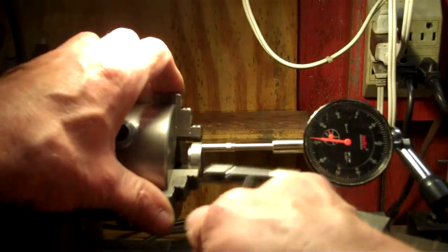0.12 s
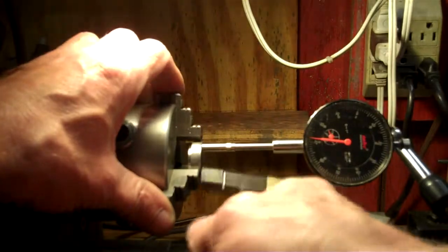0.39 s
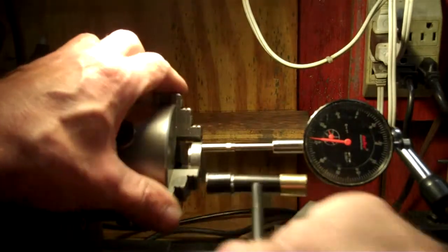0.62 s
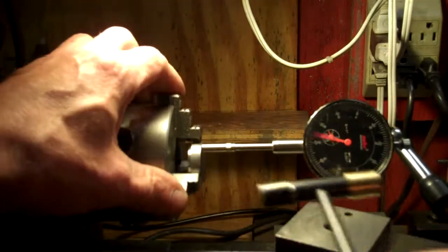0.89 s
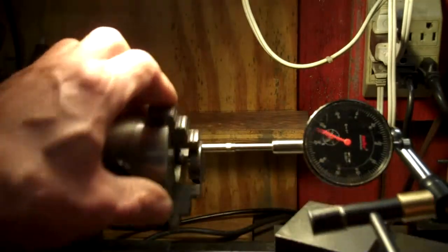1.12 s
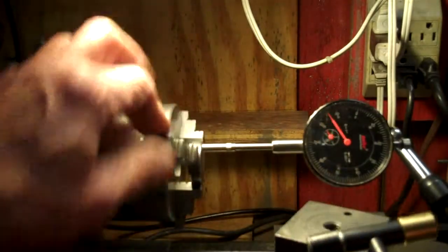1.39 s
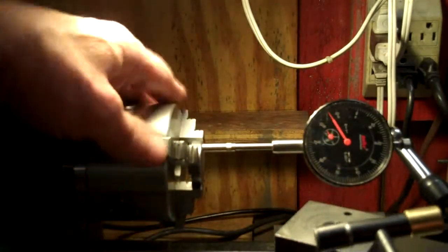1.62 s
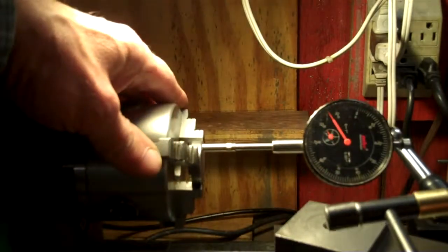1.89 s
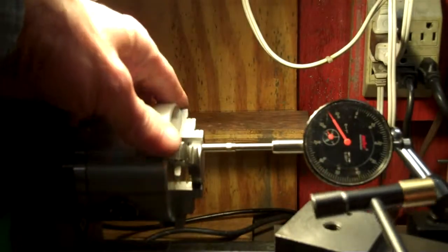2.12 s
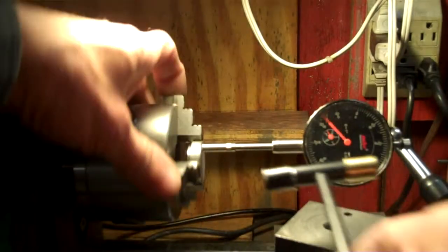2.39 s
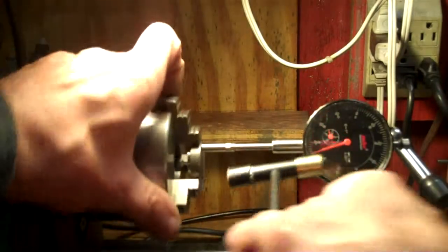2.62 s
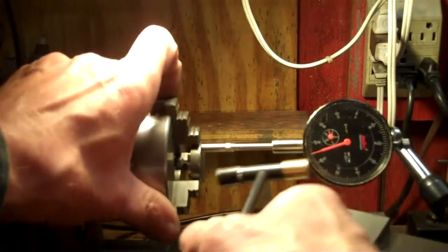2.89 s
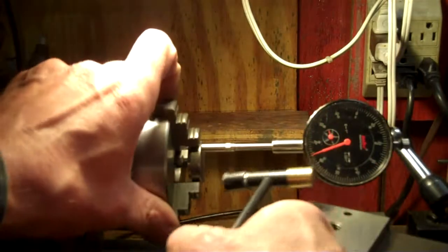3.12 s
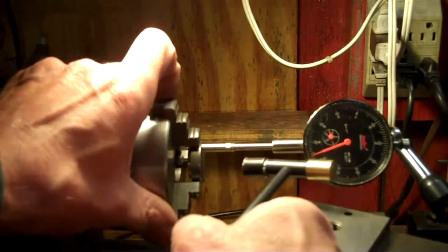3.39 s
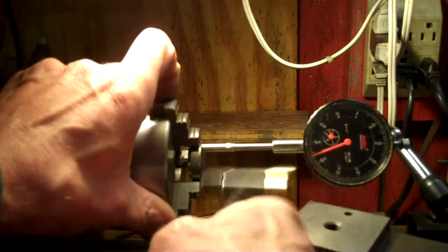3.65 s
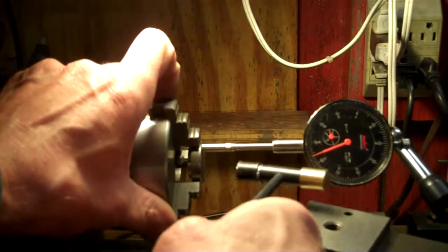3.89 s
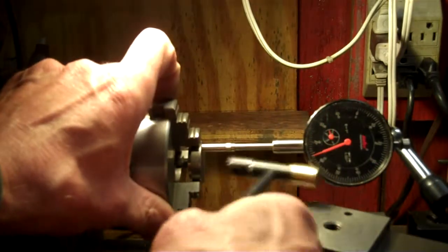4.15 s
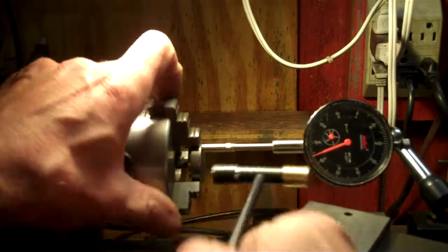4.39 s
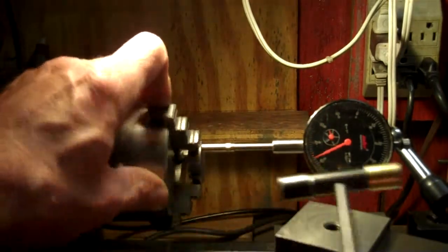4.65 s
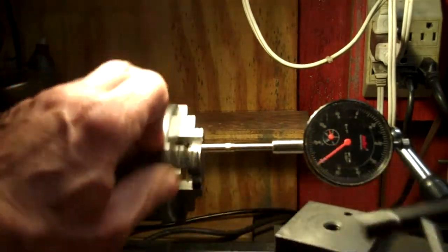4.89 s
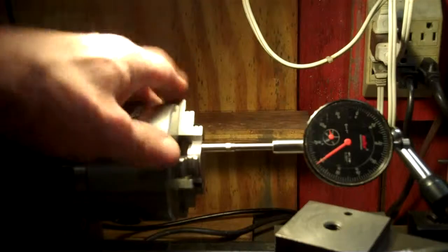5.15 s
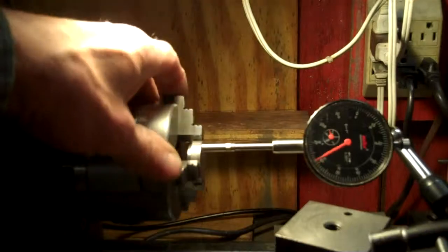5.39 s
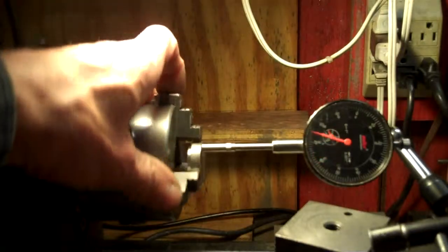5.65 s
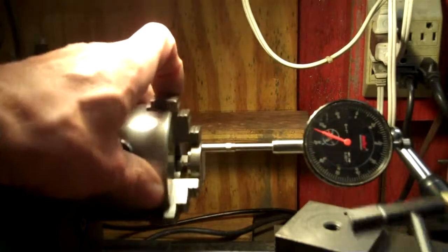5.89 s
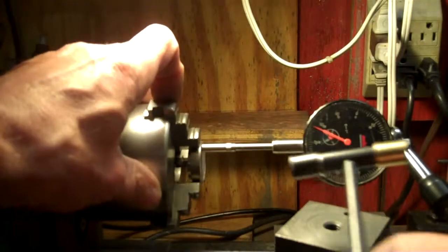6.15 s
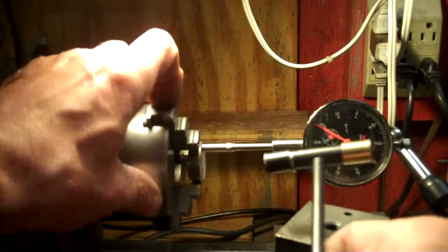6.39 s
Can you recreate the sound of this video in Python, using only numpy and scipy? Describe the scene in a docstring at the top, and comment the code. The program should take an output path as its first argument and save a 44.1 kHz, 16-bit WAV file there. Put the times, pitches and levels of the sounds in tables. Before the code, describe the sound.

Three piercing, clipped steel clanks with tiny bounces open the scene, close to a stereo microphone. Loose gear teeth rattle as the chuck is turned by hand; tools click softly, then one loud snap and a gritty scrape. Three more clanks follow, spaced unevenly, then rattling, rustling and a weak squeaking belt in a short-echo workshop with low hum and steady hiss.

```python
"""In a quiet workshop, a small brass hammer taps a steel part true in the chuck of a bench lathe.
Six hard blows, each with a bounce, are decaying sines of steel and bed plus a clatter of dying noise.
Between them a hand turns the chuck: gears rattle and skin and cloth rustle, both from shaped noise.
The belt squeaks in overtones of its slips; a tool clicks and scrapes in short or torn noise.
The workshop hums and hisses behind; the close stereo microphone clips on the blows."""
import sys
import numpy as np
from scipy import signal
from scipy.fft import rfft, irfft, next_fast_len
from scipy.io import wavfile
from scipy.ndimage import uniform_filter1d, map_coordinates

SR = 44100
rng = np.random.default_rng(int(sys.argv[2]) if len(sys.argv) > 2 else 0)


def volts_from_decibels(level):
    """Turn decibel levels (scalar or array-like) into linear amplitude factors."""
    exponent = np.asarray(level, float) / 20
    return 10 ** exponent


def dump_mix(stems):
    """Bounce the given channels to the path in sys.argv[1] as a 16-bit WAV at rate SR."""
    frames = np.atleast_2d(stems).T  # one column per channel
    limited = np.clip(frames, -1, 1)  # hard clip at full scale
    pcm = np.round(limited * 32767).astype(np.int16)
    wavfile.write(sys.argv[1], SR, pcm)


N = 287532  # length [samples]

# air and microphone hiss: (frequency [Hz], level per Hz [dB])
AIR_COLOUR = [(15, -46), (25, -18), (85, -18.5), (116, -6.5), (160, -19), (198, -7), (373, -21),
              (500, -15.5), (669, -17), (724, -16), (1300, -19.5), (1780, -22.5), (3750, -21),
              (4060, -21.5), (14100, -27)]
# how alike the hiss is at left and right: (frequency [Hz], likeness [-1 to 1])
AIR_LIKENESS = [(60, -0.34), (240, 0.5), (950, 0.51), (3750, -0.09), (14900, -0.03)]
# hum bands: (centre [Hz], level [dB], half-width [Hz])
HUM_BANDS = [(124, -76, 2.7), (186, -69, 4.1), (285, -74.5, 33), (462, -77.5, 5.5)]
# hammer blows: (time [s], level [dB], treble less 9 [dB], bounce delay [s], bounce loss [dB])
BLOWS = [(0.1854, 0.5, -8.5, .0165, 14), (.3384, 5, -11, .0116, 7.5), (0.4984, 5.5, -6.5, .0108, 11.5),
         (3.7792, 5, -5, .0129, 10), (4.1680, 5, -5.5, .0132, 10.5), (4.3243, 5, -5, .0116, 8)]
# ringing of part, chuck and hammer head: (pitch [Hz], level [dB], own time to fall 60 dB [s])
STEEL_MODES = [(2057, -27.5, 0.09), (2697, -15, .06), (2753, -4, 0.063), (2785, -12, .12),
               (3234, -19.5, 0.057), (4180, -22, 0.061), (5094, -12, 0.061), (5470, -12.5, .06),
               (5969, -9.5, 0.077), (6090, -12.5, .05), (6384, -12.5, 0.058), (6994, -15, .07),
               (7537, -16.5, .07), (7956, -7.5, 0.049), (8270, -17, 0.016)]
# ringing of lathe bed and bench: (pitch [Hz], level [dB], time to fall 60 dB [s])
BED_MODES = [(183, -38, 0.39), (262.5, -16.5, 0.33), (299.5, -18.5, 0.46), (375, -6.5, 0.16),
             (388, -7.5, 0.28), (453.5, 0.5, 0.11), (625, -21.5, .15), (763, -22.5, .12), (925, -27, 0.23),
             (1210, -22.5, .07)]
# colour of loose metal clattering after a contact: (frequency [Hz], level per Hz [dB])
CLATTER_COLOUR = [(300, -48.5), (600, -20), (1000, -17), (1500, -26.5), (2200, -16.5), (2750, -9.5),
                  (3300, -7.5), (4600, -8.5), (5200, -4.5), (6500, -7), (8100, -6), (8500, -14),
                  (10500, -20), (13500, -20.5), (14000, -29), (15500, -43.5)]
# how the clatter dies by itself: (frequency [Hz], time to fall 60 dB [s])
CLATTER_DECAY = [(500, 0.088), (1500, 0.21), (2700, .12), (4000, 0.08), (7000, 0.075), (12000, 0.077)]
# lathe sound at the two microphone ports: (frequency [Hz], left over right [dB])
PORT_LEVELS = [(100, 0.5), (300, 0), (700, 2.5), (1500, 1.5), (2700, -2), (4500, -0.5), (6500, -4.5),
               (8000, 10), (10000, 8), (14000, 5.5)]
# phase at the two ports: (frequency [Hz], left ahead of right [rad])
PORT_PHASES = [(300, -1.73), (460, 0.28), (700, 0), (1500, -1.3), (2700, -0.41), (4500, -0.9),
               (5500, -0.66), (7500, 1), (9000, 2), (14000, 1.7)]
# the room's answer: (frequency [Hz], time to fall 60 dB [s])
ROOM_DECAY = [(300, 0.22), (2000, 0.19), (7000, .25), (12000, 0.084)]
# skin and cloth sliding over metal: (start [s], rise [s], hold [s], fall [s], level [dB])
RUBS = [(0.661, .04, 0.21, .1, -65.5), (0.928, 0.14, 0.072, .1, -56), (1.18, 0.056, 0.224, .22, -61.5),
        (1.697, 0.031, 0.114, .04, -63), (2.032, 0.032, .04, .12, -63.5), (2.297, .2, 0.129, .06, -53),
        (2.64, .03, .08, .02, -57.5), (2.86, .03, 0.095, .04, -60.5), (3.036, 0.017, 0.21, .07, -62),
        (3.36, .06, 0.039, .08, -65), (3.563, .05, .14, .03, -62), (4.498, .07, 0.138, .05, -60),
        (4.72, 0.039, .33, .12, -59), (5.386, 0.036, .7, .05, -63.5), (6.214, 0.058, .06, .06, -65),
        (6.428, .06, .04, .03, -59)]
# colour of the rustle, and of a knock's bright edge: (frequency [Hz], level per Hz [dB])
RUSTLE_COLOUR = [(880, -50), (1500, -16), (1630, -22), (1930, -26), (2460, -12), (4040, -12.5),
                 (4350, -9.5), (4600, -11), (4960, -10), (5450, -7), (7080, -5), (7420, -2), (7840, -3),
                 (10000, -21), (14000, -21.5)]
# pulls of the hand on the chuck: (start [s], rise [s], hold [s], fall [s], gear rattle [dB])
PULLS = [(0.84, 0.21, 0.14, 0.55, -56), (2.052, 0.069, .2, 0.11, -65.5), (2.305, 0.24, .2, 0.034, -57.5),
         (3.044, 0.054, .12, .12, -68.5), (3.56, 0.13, 0.089, .03, -68.5), (4.596, .28, 0.11, 0.21, -54),
         (5.37, 0.275, 0.305, 0.22, -63), (6.22, 0.068, 0.046, .08, -65), (6.42, 0.087, .05, .03, -64.5)]
# resonances that colour the gears: (centre [Hz], width [Hz], level [dB])
GEAR_MODES = [(162.2, 77, -4.5), (390, 72, 3), (710, 79, -1), (1210, 130, 1), (1354, 240, -5.5),
              (1880, 380, 1), (2190, 280, -15.5), (3670, 610, -17.5)]
# the louder gear knocks: (time [s], peak of the dull body [dB])
KNOCKS = [(0.965, -44), (0.9939, -46.5), (1.0158, -48), (1.0414, -38), (1.0591, -42), (1.0851, -43.5),
          (1.1289, -35.5), (1.1444, -40), (1.2015, -40.5), (1.2236, -41.5), (1.2506, -40), (1.3087, -45.5),
          (2.72, -38), (3.1079, -50.5), (3.1705, -48), (4.7435, -41.5), (4.8559, -38.5), (4.9531, -42.5),
          (4.9928, -38), (5.4716, -41.5), (5.4994, -45.5), (5.5947, -45), (5.7186, -45.5), (5.8194, -45)]
# small contacts of tools and jaws: (time [s], level [dB], snap centre [Hz], body over snap [dB],
# left over right [dB])
TICKS = [(1.4363, -37.5, 1660, -8, 1.5), (1.736, -40, 7400, -19, 3.5), (2.2462, -54.5, 2120, -15, 3.5),
         (2.583, -37, 5500, -22.5, -8), (2.5899, -34.5, 4400, -2.5, 1), (2.621, -29.5, 7640, -33, 13),
         (2.6708, -29.5, 6400, 0, 0), (2.7546, -2.5, 7400, -7.5, 5), (4.2906, -24, 1907, -6.5, -2),
         (4.3002, -24.5, 2080, -7, 4), (4.6376, -44, 3500, -0.5, 0), (5.253, -37, 6960, -23, 11.5),
         (5.3122, -49.5, 2160, 0, 5)]
# belt squeaks: (start [s], length [s], slip rate [Hz], level [dB])
SQUEAKS = [(1.483, 0.043, 726, -58.5), (1.541, 0.018, 743, -63), (1.585, 0.032, 763, -66.5),
           (2.256, 0.043, 722, -66), (2.301, 0.053, 714, -59.5), (4.665, 0.052, 724, -64),
           (5.756, 0.37, 722.6, -57.5), (6.16, 0.048, 726, -65.5), (6.27, 0.036, 730, -61.5),
           (6.333, 0.017, 721, -68), (6.48, .06, 725, -60)]
# strength of each multiple of the slip rate, lowest first: (level [dB])
SQUEAK_OVERTONES = [-2, -2, 0, -11, -16, -15, -14, -20]
# a tool dragged over steel, creeping, biting, letting go: (time [s], level [dB])
SCRAPE_LEVEL = [(2.75, -72), (2.765, -40), (2.791, -38.5), (2.794, -27.5), (2.812, -21.5), (2.834, -23),
                (2.842, -38.5), (2.86, -51), (2.9, -65)]
# colour of the scrape: (frequency [Hz], level per Hz [dB])
SCRAPE_COLOUR = [(180, -60.5), (300, -36), (403, -27), (597, -37), (869, -14), (1520, -18.5), (1700, -12),
                 (2210, -6.5), (2440, -19), (2820, -14.5), (4850, -22.5), (8050, -8), (10600, -46),
                 (13600, -39), (15000, -82)]


def unit(x):
    """Scales x to an average strength (rms) of 1."""
    return x / np.sqrt(np.mean(x ** 2) + 1e-20)


def along(points, hz):
    """Reads a (Hz, value) curve on a log frequency axis."""
    f, value = np.transpose(points)
    return np.interp(np.log(hz + 1), np.log(f + 1), value)


def wobble(rate):
    """A smooth random curve with rate random points a second."""
    return map_coordinates(rng.standard_normal(int(N * rate / SR) + 4), [np.arange(N) * rate / SR])


def swell(start, rise, hold, fall):
    """A smooth rise to 1, a hold and a fall; times in seconds."""
    t = np.arange(N) / SR - start
    slope = np.minimum(t / rise, (rise + hold + fall - t) / fall)
    return np.sin(np.pi / 2 * np.clip(slope, 0, 1)) ** 2


def filtered(x, response):
    """Multiplies the spectrum of x by a response of frequency."""
    m = next_fast_len(x.shape[-1] + 8192)
    return irfft(rfft(x, m) * response(np.fft.rfftfreq(m, 1 / SR)), m)[..., :x.shape[-1]]


def resonance(hz, centre, width):
    """Response that lets through a band round its centre, all in Hz."""
    return 1j * hz * width / (centre ** 2 - hz ** 2 + 1j * hz * width)


def pair(colour, likeness):
    """Stereo noise of rms 1: the balance of middle and side sets how alike left and right are."""
    def response(hz):
        angle = np.arccos(np.clip(along(likeness, hz), -1, 1)) / 2
        return volts_from_decibels(along(colour, hz)) * np.array([np.cos(angle), np.sin(angle)])
    mid, side = filtered(rng.standard_normal((2, N)), response)
    return unit(np.array([mid + side, mid - side]))


def dying(times, length):
    """Two channels of noise in which each frequency dies at its own speed; energy 1 in the first."""
    hz, t, z = signal.stft(rng.standard_normal((2, length)), SR, nperseg=128)
    fade = volts_from_decibels(-60 * t / along(times, hz)[:, None])
    tail = signal.istft(z * fade, SR, nperseg=128)[1][:, :length]
    return tail / np.linalg.norm(tail[0])


def ring(modes, t, scatter_db, attack, detune):
    """Metal rings as decaying sines, at slightly new strengths and pitches each time."""
    hz, db, t60 = np.transpose(modes)[:, :, None]
    hz = hz * (1 + detune * rng.standard_normal(hz.shape))
    size = volts_from_decibels(db + scatter_db * rng.standard_normal(hz.shape) - 60 * t / t60)
    return (size * np.sin(2 * np.pi * hz * t)).sum(0) * (1 - np.exp(-(t / attack) ** 2))


def workshop():
    """Air and microphone hiss as wide noise, with a few hum bands of narrow noise."""
    def band(centre, width):
        noise = rng.standard_normal(N)
        return unit(filtered(noise, lambda hz: 1 / (1 + ((hz - centre) / width) ** 2)))
    hiss_db = -59 + .5 * wobble(1.411) + np.array([[.7], [-.7]])  # slightly stronger at left
    hum = sum(volts_from_decibels(db) * band(centre, width) for centre, db, width in HUM_BANDS)
    return volts_from_decibels(hiss_db) * pair(AIR_COLOUR, AIR_LIKENESS) + hum


def hammer():
    """Every contact rings the steel, shakes loose metal and thumps the bed."""
    bounce_duller_db, thump_db, bounce_thump_db = 4, -19, -21.5
    out, wide = np.zeros(N + SR), np.zeros(N + SR)
    t = np.arange(SR // 2) / SR
    early = volts_from_decibels(-60 * t / .03)  # most of the ring drains fast into the heavy chuck
    low = [mode for mode in STEEL_MODES if mode[0] < 4600]
    high = [mode for mode in STEEL_MODES if mode[0] >= 4600]
    contacts = []
    for s, db, treble_db, after, loss_db in BLOWS:
        contacts.append((s, db, treble_db + 9, thump_db))
        contacts.append((s + after, db - loss_db, treble_db + 9 - bounce_duller_db, bounce_thump_db))
    for s, db, treble_db, bed_db in contacts:
        clank = ring(low, t, scatter_db=4.5, attack=0.0005, detune=0.0054) * (early + .12)
        bright = ring(high, t, scatter_db=4, attack=0.00031, detune=0.021) * (early + 0.023)
        thump = ring(BED_MODES, t, scatter_db=3, attack=0.0077, detune=0.0077)

        def colour(hz):
            boost_db = treble_db / (1 + (4600 / (hz + 1)) ** 12)  # acts mostly above 4600 Hz
            return volts_from_decibels(along(CLATTER_COLOUR, hz) + boost_db)
        clatter = filtered(dying(CLATTER_DECAY, len(t)), colour) * (1 - np.exp(-t / 0.00022))
        sound = clank + volts_from_decibels(treble_db) * bright + volts_from_decibels(bed_db) * thump
        sound = sound + volts_from_decibels(30) * clatter[0] * (early + 0.19)
        first = round(s * SR)
        out[first:][:len(t)] += volts_from_decibels(db) * sound
        wide[first:][:len(t)] += volts_from_decibels(db + 14) * clatter[1] * (early + 0.86)
    return out[:N], wide[:N] * [[1], [-1]]  # wide: loose parts to the left and right


def rustle():
    """Skin and cloth slide over metal: fluttering noise that swells with each rub."""
    stroke = sum(volts_from_decibels(db) * swell(*shape) for *shape, db in RUBS)
    flutter = volts_from_decibels(1.5 * wobble(30) + 1.5 * wobble(200))
    noise = unit(flutter * pair(RUSTLE_COLOUR, [(3000, 0.32), (8000, 0.46)]))
    return stroke * volts_from_decibels(1.5 * wobble(9)) * noise * volts_from_decibels([[2.5], [-2.5]])  # stronger at left


def gears():
    """Gear teeth grind and knock into the headstock: gritty noise and short bursts in resonances."""
    faint_per_s, faint_db, faint_scatter_db = 14, 10, 1.5  # faint knocks; peak over the rattle
    edge_db, edge_scatter_db = -12, 2  # a knock's bright edge under its body

    def body(hz):
        return sum((-1) ** k * volts_from_decibels(db) * resonance(hz, centre, width)
                   for k, (centre, width, db) in enumerate(GEAR_MODES))
    grind = sum(volts_from_decibels(db) * swell(*shape) for *shape, db in PULLS)
    grit = volts_from_decibels(2.5 * wobble(45) + 3 * wobble(300))
    teeth = np.pad(grind * unit(filtered(grit * rng.standard_normal(N), body)), (0, SR))
    t = np.arange(SR // 10) / SR
    fade = (volts_from_decibels(-60 * t / 0.0056) + 0.7 * volts_from_decibels(-60 * t / .06)) * (1 - np.exp(-t / 0.00073))
    # faint knocks fall at random and follow the strength of the pull
    at = rng.integers(N, size=faint_per_s * N // SR)
    faint_size = grind[at] * volts_from_decibels(faint_db + faint_scatter_db * rng.standard_normal(len(at)))
    loud = [(round(s * SR), volts_from_decibels(db)) for s, db in KNOCKS]
    for first, size in loud + list(zip(at, faint_size)):
        burst = rng.standard_normal((2, len(t))) * fade
        dull = filtered(burst[0], body)
        bright = filtered(burst[1], lambda hz: volts_from_decibels(along(RUSTLE_COLOUR, hz)))
        edge = volts_from_decibels(edge_db + edge_scatter_db * rng.standard_normal())
        knock = dull / abs(dull).max() + edge * bright / abs(bright).max()
        teeth[first:][:len(t)] += size * knock
    return teeth[:N]


def ticks():
    """Short contacts of tools and jaws: a noise snap round its centre and a duller body."""
    out, t = np.zeros((2, N + SR)), np.arange(SR // 10) / SR
    for s, db, centre, body_db, pan_db in TICKS:
        drag = .05 * volts_from_decibels(-0.3 * db)  # share that rings on; softer contacts drag more
        fade = volts_from_decibels(-60 * t / 0.0099) + drag * volts_from_decibels(-60 * t / 0.088)
        burst = rng.standard_normal((2, len(t))) * fade * (1 - np.exp(-t / 0.00095))

        def snap_response(hz):
            spread = 0.12 * (hz > 1200) / (1 + (hz / 8800) ** 9)
            return spread + resonance(hz, centre, 2000) ** 2

        def body_response(hz):
            middle = resonance(hz, 1500, 1800) / (1 + 1j * hz / 5000)
            return middle + .5 * resonance(hz, 250, 250)
        snap, body = filtered(burst[0], snap_response), filtered(burst[1], body_response)
        tick = snap / abs(snap).max() + volts_from_decibels(body_db) * body / abs(body).max()
        sides = volts_from_decibels(db + np.array([[.5], [-.5]]) * pan_db)
        out[:, round(s * SR):][:, :len(t)] += sides * tick
    # the microphone dulls all the ticks, most of all above 9200 Hz
    return filtered(out[:, :N], lambda hz: 0.15 + 0.65 / (1 + (hz / 9200) ** 10))


def squeak():
    """The belt sticks and slips at a nearly steady rate, giving a tone with wavering overtones."""
    edge = 0.011  # half the rise or fall [s]
    clock = np.cumsum(1 + .003 * wobble(60)) / SR  # slightly uneven time
    flicker = volts_from_decibels(1.5 * wobble(70))
    strengths = [volts_from_decibels(db + 2.3 * wobble(25)) for db in SQUEAK_OVERTONES]
    out = np.zeros(N)
    for s, length, slips_hz, db in SQUEAKS:
        span = slice(round((s - edge) * SR), round((s + length + edge) * SR))
        tone = sum(strength[span] * np.sin(2 * np.pi * k * slips_hz * clock[span])
                   for k, strength in enumerate(strengths, 1))
        shape = swell(s - edge, 2 * edge, length - 2 * edge, 2 * edge)
        out[span] += volts_from_decibels(db) * shape[span] * tone
    return out * flicker


def scrape():
    """Steel drags on steel: noise torn into uneven grains."""
    s, db = np.transpose(SCRAPE_LEVEL)
    t = np.arange(N) / SR
    on = uniform_filter1d(1. * ((t > s[0]) & (t < s[-1])), size=600)  # softened start and end
    grains_db = 1.7 * np.tanh(wobble(250)) + 2.6 * np.tanh(wobble(700)) + 2.5 * np.tanh(wobble(110))
    noise = pair(SCRAPE_COLOUR, [(500, 1.0), (3000, 0.92), (8000, 0.15)])
    sides_db = np.interp(t, s, db) + np.array([[1.5], [-1.5]])  # stronger at left
    return on * volts_from_decibels(sides_db) * unit(volts_from_decibels(grains_db) * noise)


def placed(x):
    """The lathe reaches the two microphone ports at different strengths and phases."""
    def response(hz):
        half = np.sqrt(volts_from_decibels(along(PORT_LEVELS, hz))) * np.exp(.5j * along(PORT_PHASES, hz))
        return np.array([half, 1 / half])
    return filtered(x, response)


def room(x):
    """The room's short answer: x smeared by dying noise, 300 samples late."""
    late = np.pad(x, (300, 0))[None]
    return volts_from_decibels(-26.5) * signal.fftconvolve(late, dying(ROOM_DECAY, SR // 2), axes=1)[:, :N]


def scene():
    """The lathe near the microphone, the room's short answer, the background."""
    background = workshop()
    blows, wide = hammer()
    hand = rustle()
    lathe = blows + gears() + squeak()
    small = ticks() + scrape()
    return placed(lathe) + wide + small + hand + room(lathe + small.mean(0)) + background


def roll_off(x):
    """The treble ends steeply here."""
    return signal.sosfilt(signal.butter(12, 15500, fs=SR, output="sos"), x)


def record(dry):
    """The blows clip the input, with rounded corners; little is kept above 14200 Hz."""
    clipped = dry / (1 + abs(dry / 0.97) ** 8) ** (1 / 8)
    limited = filtered(clipped, lambda hz: .05 + 0.94 / (1 + (hz / 14200) ** 60))
    return roll_off(limited)


dry = scene()
out = record(dry)
dump_mix(out)
```